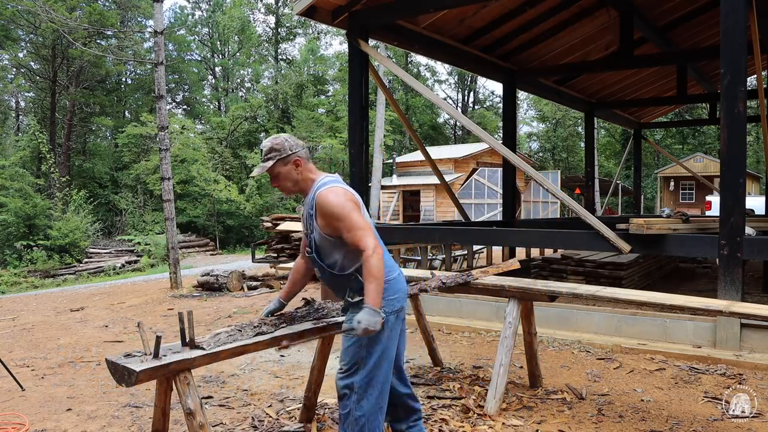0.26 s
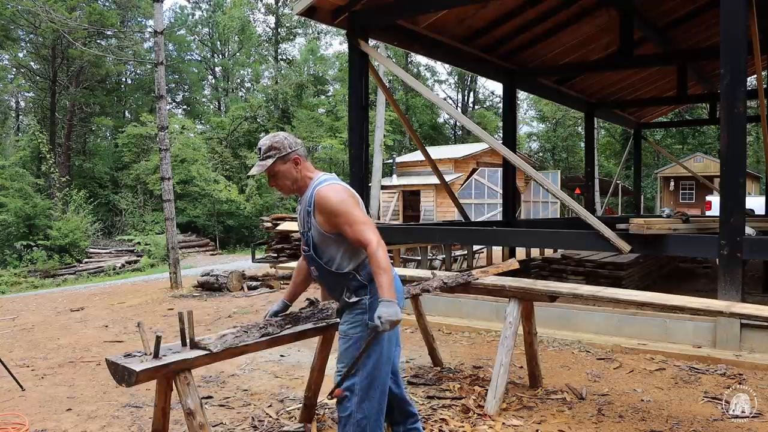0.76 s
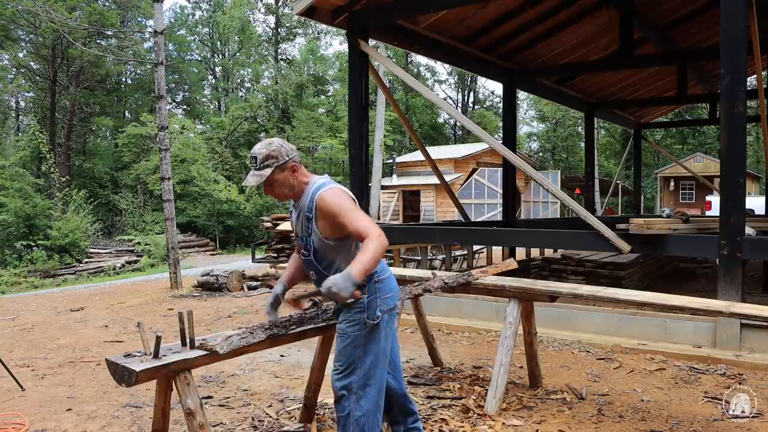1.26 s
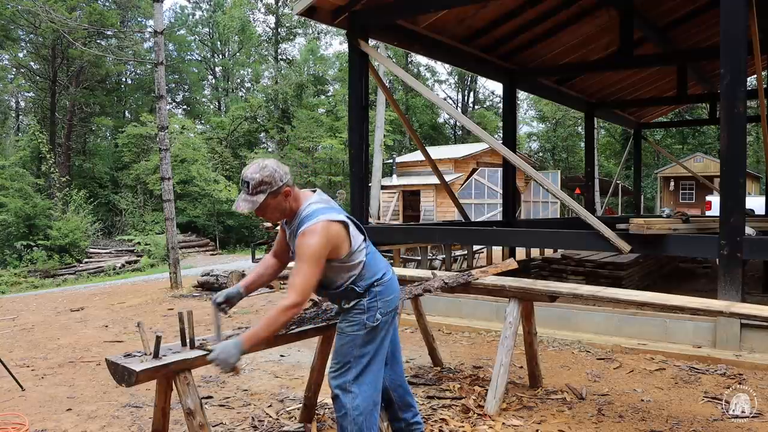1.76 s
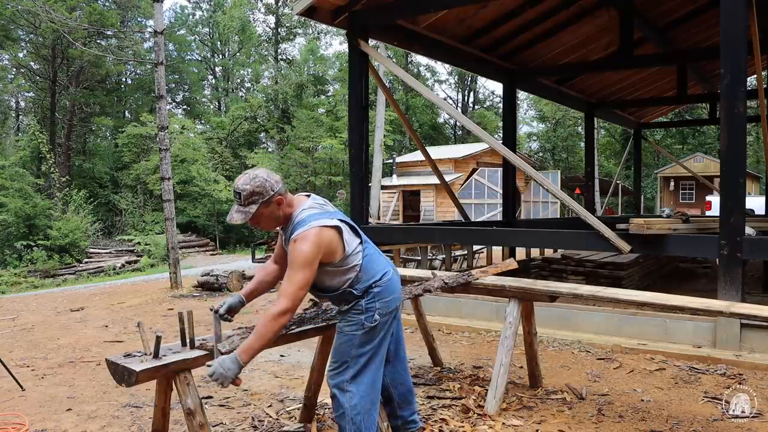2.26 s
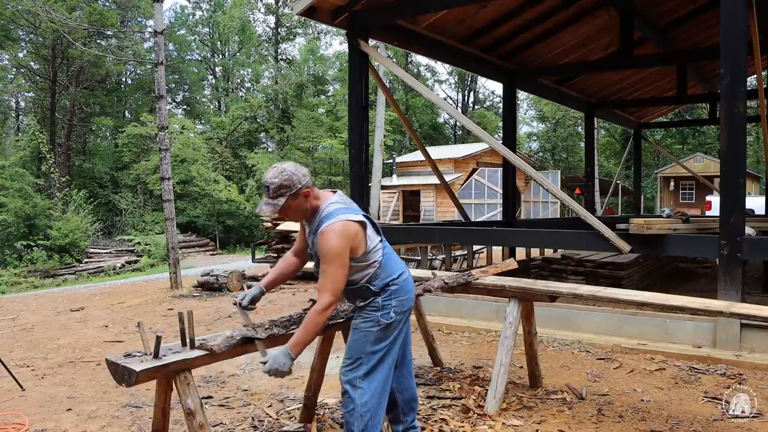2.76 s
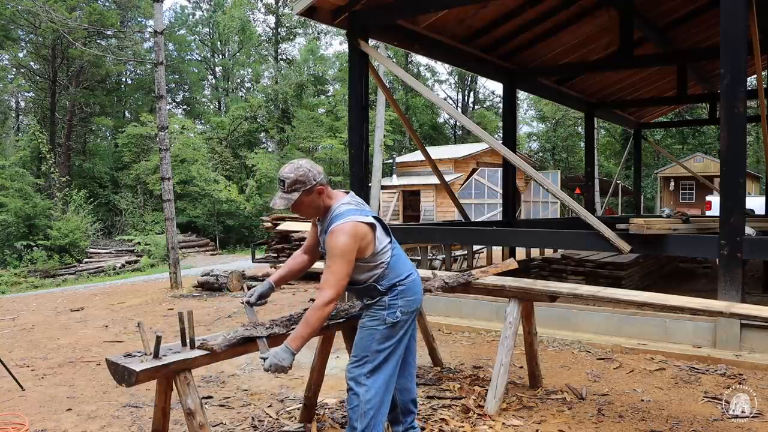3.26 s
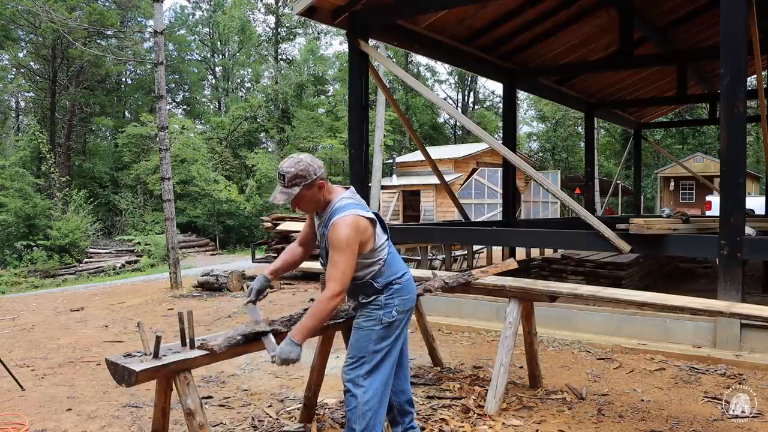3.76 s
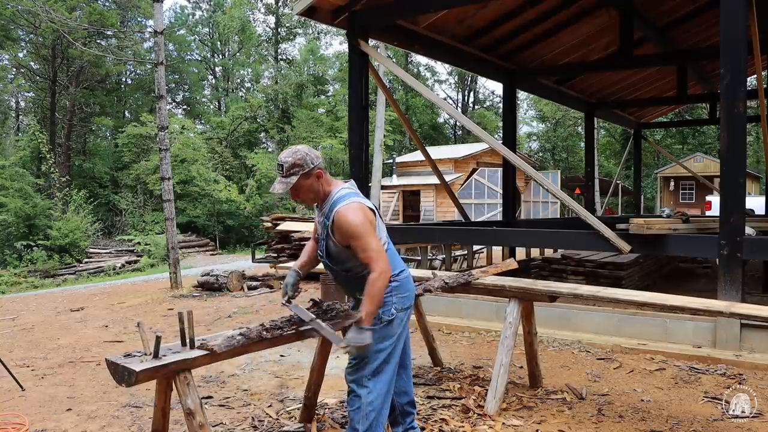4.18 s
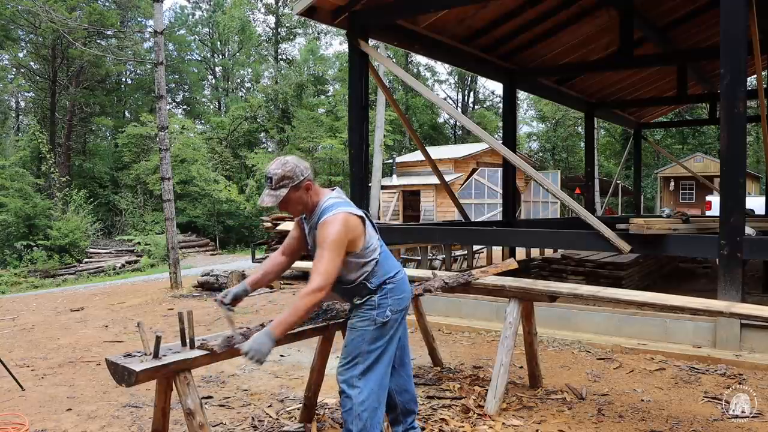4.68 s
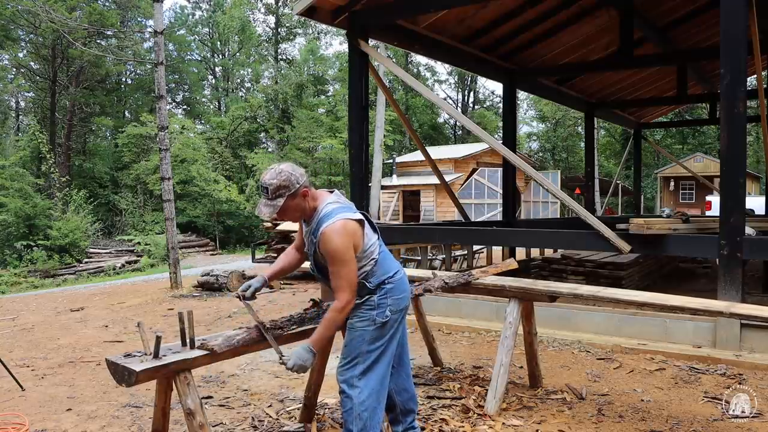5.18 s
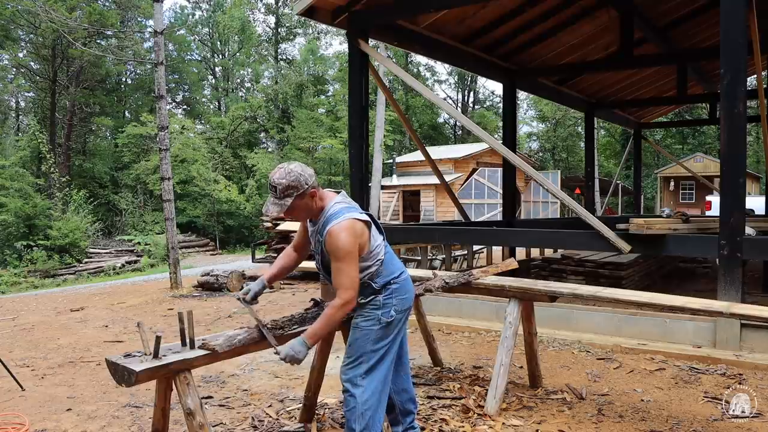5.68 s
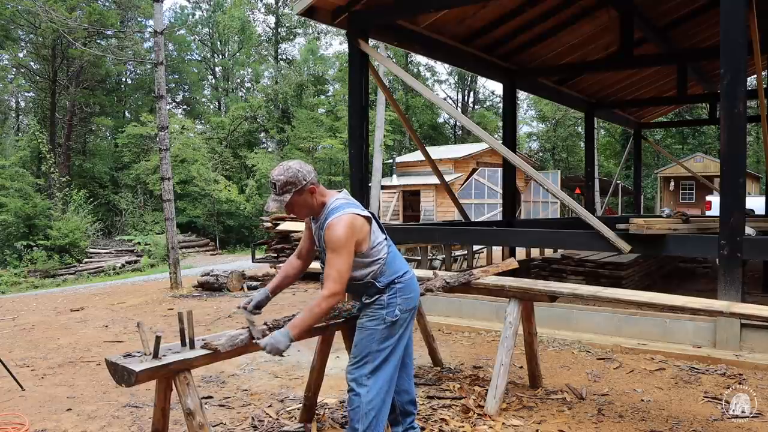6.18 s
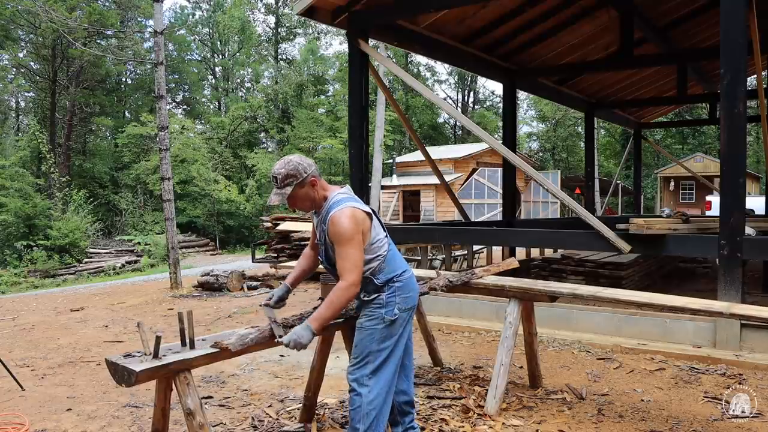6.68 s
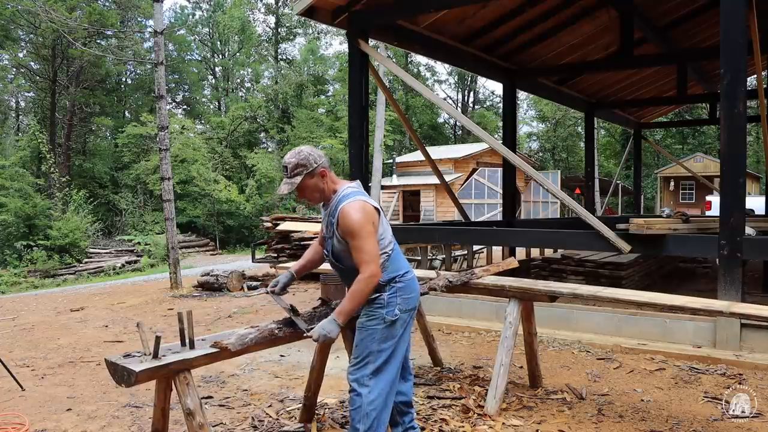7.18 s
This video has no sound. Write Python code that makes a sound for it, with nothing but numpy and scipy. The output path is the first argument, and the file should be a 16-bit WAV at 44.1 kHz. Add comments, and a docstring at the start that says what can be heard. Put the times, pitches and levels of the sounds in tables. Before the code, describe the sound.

Quiet scraping and scattered woody snaps build to a few very loud, sharp bark cracks with brief steel ringing, over faint forest insect hiss.

```python
"""A steady insect hiss over open air, a faint short scrape, then knocks: a man peels a pine slab with a drawknife.
Scrape and soft rustles of his steps: tiny coloured clicks under one kind of envelope. Cracks: noise bursts of
breaking bark. Knocks and one short squeak: damped modes of the slab on its trestles plus coloured noise bursts.
Steel: rings after hard bites and sings faintly on bare wood. Shed roof: short scattered echo.
Forest: two bands of coloured noise."""
import sys
import numpy as np
from scipy import signal
from scipy.fft import rfft, irfft
from scipy.io import wavfile
from scipy.ndimage import uniform_filter1d

SR = 44100
rng = np.random.default_rng(int(sys.argv[2]) if len(sys.argv) > 2 else 0)


def persist_wave(psi):
    """Save psi, clipped to +-1, as 16-bit WAV."""
    counts = np.round(np.clip(psi, -1, 1) * 32767).astype(np.int16)
    wavfile.write(sys.argv[1], SR, np.atleast_2d(counts).T)


N = 328545
TIME_S = np.arange(N) / SR

# open air and forest: (frequency [Hz], relative density [dB per Hz])
AIR_COLOUR = [(15, -48), (35, -3.5), (60, 0.5), (120, 6), (220, 0), (500, -0.5), (800, -0.5), (1250, -10.5),
              (2800, -11), (4800, -20), (8500, -21), (14000, -20.5), (15300, -23.5), (16000, -16.5)]
# insect chorus: (frequency [Hz], relative density [dB per Hz])
INSECT_COLOUR = [(4800, -24), (5300, -19.5), (5900, -21), (6300, -9.5), (6700, -1.5), (7150, -0.5),
                 (7500, -8.5), (7900, -17), (8200, -23), (10000, -76)]
# echo decay: (frequency [Hz], t60 [s])
SHED_T60 = [(150, 0.36), (400, 0.25), (1000, 0.41), (2800, 0.56), (7000, 0.59), (14000, 0.3)]
# echo spectrum: (frequency [Hz], relative level [dB])
SHED_COLOUR = [(100, 15.5), (400, 17.5), (1000, 11.5), (2800, 2.5), (5000, 1.5), (8000, 0.5), (15000, -3)]
# sound sent toward the shed as the man shifts along the slab: (time [s], gain [dB])
TOWARD_SHED = [(.13, -7), (2.8, 3), (3.8, -10), (4.4, -9), (4.9, -7), (5.6, -6), (6.33, -3), (6.69, -5.5),
               (7.02, -2.5)]
# blows on the slab, and one short squeak (3.767):
# (time [s], relative level [dB], centre [Hz], spread [octaves], contact time [s])
KNOCKS = [(.1292, -8.5, 950, 0.39, 0.05), (.136, -12.5, 705, 0.82, 0.044),  (0.983, -30, 298, 0.86, 0.058),
          (2.184, -31.5, 220, 0.76, 0.24), (2.526, -34, 740, 0.9, 0.13), (3.767, -17, 880, 0.23, 0.02),
          (4.4081, -9, 895, 0.68, 0.0044), (4.793, -18.5, 175, 0.99, 0.057),
          (4.8998, -7.5, 684, 0.82, 0.067), (4.903, -4.5, 343, 0.2, 0.025), (4.921, -19, 328, 1.44, 0.099),
          (5.192, -25, 704, 0.5, 0.074), (5.222, -26.5, 260, 1.2, .06), (5.428, -24.5, 316, 0.26, 0.26),
          (5.577, -29.5, 800, 0.57, 0.015), (5.607, -22, 460, 0.41, 0.07), (5.615, -18.5, 161, 0.87, 0.05),
          (5.992, -24.5, 487, 0.78, 0.024), (6.299, -28.5, 516, 1.03, .031), (6.674, -12, 454, 0.89, 0.018)]
# modes of the slab on its trestles: (frequency [Hz], relative level [dB], t60 [s])
SLAB_MODES = [(174, 3.5, 0.18), (287, 5, 0.052), (334, 1, 0.11), (464.4, 8, 0.12), (586, -6, 0.058),
              (651, 9, 0.092), (766, -30, 0.12), (854, 6.5, 0.09), (923, 8, 0.062), (1087, -37, 0.069),
              (1286, -8, 0.08), (1550, -20, 0.24), (1900, -32, 0.04), (2250, 10.5, 0.13)]
# blade springing free: (time [s], relative ring level [dB], favoured pitch [Hz])
BITES = [(5.99, -30, 3640), (6.334, -35, 2300), (6.688, -35, 2700), (7.0168, -15.5, 3950),
         (7.028, -17.5, 1200)]
# modes of the blade wedged in the wood: (frequency [Hz], width before extra damping [Hz], relative level [dB])
BLADE_MODES = [(640, 10.4, 2), (880, 22, -14), (1193, 18, 2.5), (1540, 22, 1), (2200, 120, -9.5),
               (2700, 71, -4.5), (3150, 73, -11), (3340, 88, -7.5), (3770, 25, 1.5), (4050, 120, -8),
               (4450, 43, -14), (4900, 105, -27), (4830, 12.7, 3.5), (5690, 85, -8.5)]
# edge sliding on bare wood: (frequency [Hz], relative level [dB])
FRICTION_COLOUR = [(300, -20), (650, -3), (880, 10), (1200, -4), (1600, 1), (2600, -2), (3650, -4),
                   (4500, -8), (4850, -1), (5100, -3), (6000, -14), (9000, -30)]
# tearing fibres and flakes: (frequency [Hz], relative level [dB])
RASP_COLOUR = [(300, -59), (1000, -3.5), (1700, -2), (2800, 5.5), (4000, -3), (5500, -7), (8000, -16),
               (16000, -43)]
# rubbing wood: (frequency [Hz], relative level [dB])
RUB_COLOUR = [(60, -1.5), (170, -12.5), (400, 6.5), (650, 6.5), (900, 6.5), (1300, -1.5), (2200, -12),
              (5000, -24)]
# crumbling dry bark: (frequency [Hz], relative level [dB])
CRUMB_COLOUR = [(1000, -29), (3000, -1), (6000, -10), (9000, 6), (13000, 3), (16000, -13)]
# pulls of the blade, and soft rustles as the man steps (0.448, 0.819):
# (start [s], length [s], relative level [dB], bare wood under the edge [0-1], crumbling above that level [dB])
STROKES = [(0, 0.038, -44, 0, -25), (0.21, 0.094, -44, 0.45, -11.5), (0.448, .13, -49, 0.25, -25),
           (0.819, 0.19, -46.5, 0, -22), (2.092, 0.019, -59.5, 0.83, -13), (2.178, 0.11, -55.5, 0.53, -18),
           (2.426, 0.056, -57.5, 0.7, -18), (2.523, 0.055, -53.5, 0.91, -3), (2.602, 0.14, -47, 0, -18),
           (2.944, 0.17, -53, .2, -10), (3.2, 0.039, -51.5, 0, -9), (3.553, 0.26, -45.5, 0, -9.5),
           (3.898, 0.12, -49.5, 0.37, -3.5), (4.103, 0.039, -55.5, 0.77, -22),
           (4.181, 0.032, -48.5, 0.3, -8), (4.29, 0.28, -45.5, .1, -10), (4.662, 0.15, -48, 0.48, -6),
           (4.947, 0.12, -44.5, 0.64, -15), (5.149, 0.04, -48, 0.76, -19), (5.401, 0.089, -53.5, 0.59, -27),
           (5.537, 0.067, -50, 0.68, -10), (5.728, 0.087, -53, 0.54, -13), (5.95, 0.03, -41, .45, -21),
           (7.005, 0.045, -34, 0, -14), (7.342, 0.047, -45.5, 0, -3), (7.422, .03, -39, 0.2, -1)]
# larger pieces of bark breaking: (time [s], relative level [dB], woody body [dB], splintery top [dB], t60 [s])
CRACKS = [(0.265, -43, -17, 13, 0.015), (0.7234, -41.5, 10, -26, 0.061), (.7567, -43, 6.5, -17, 0.023),
          (2.7745, -32, -4, -17, 0.029), (2.7867, -28, -0.5, -16, 0.022), (2.857, -30.5, -3.5, -24, 0.02),
          (2.97, -40, 5.5, -20, 0.039), (3.1091, -41, 13, -28, 0.053), (3.2665, -36, -8, -24, 0.019),
          (3.3753, -39.5, -1, -22, .023), (3.4083, -37.5, 2.5, -33, 0.0047), (3.642, -28.5, -3, -17, .028),
          (3.6533, -28, -6, -22, 0.018), (3.7127, -28, -1, -7.5, 0.014), (3.7296, -29.5, 0, -16, 0.024),
          (3.789, -28.5, 10, -25, 0.048), (3.8077, -30.5, 8, -19, 0.081), (3.8297, -31.5, 11.5, -22, .03),
          (3.989, -26.5, 10.5, -10, 0.033), (4.3004, -43.5, 12, -24, 0.048), (4.3452, -31, 10.5, -16, .022),
          (4.3925, -24.5, 11.5, -26, 0.016), (4.4064, -23, 20.5, -8.5, 0.017),
          (4.5076, -24, -7, -35, 0.022), (4.5857, -35.5, -3, -11, 0.046), (4.6157, -30, 18.5, -25, .028),
          (4.7876, -27, 11, -20, 0.03), (4.811, -20, 18, -16, 0.076), (4.8196, -17.5, -3, -22, 0.059),
          (5.1896, -34, 8, -9, .12), (5.2098, -32, 12, -4, 0.045), (5.6021, -30, 10, -17, 0.041),
          (5.9912, -15.5, -6, -25, 0.025), (6.1836, -43.5, 1, 3.5, 0.0066), (6.333, -6, 0.5, -27.5, 0.048),
          (6.672, -16.5, 3.5, -26, 0.08), (6.6875, -3, -1.5, -23.5, 0.038), (7.0035, -19, -7, -18, 0.092),
          (7.017, -5.5, 3, -10, 0.019), (7.0266, -12, -2, -14, 0.048), (7.1181, -28, 10.5, -19.5, 0.042),
          (7.3547, -30, -11, -12, 0.032), (7.37, -28, -3, -30, 0.11), (7.3796, -35, 10, -9, 0.018),
          (7.4182, -33, 0, -11, 0.017)]
# spectrum common to all cracks: (frequency [Hz], relative level [dB])
CRACK_COLOUR = [(40, -33), (150, -9.5), (280, -13), (430, -1), (950, 1.5), (1400, -3), (2400, 6.5),
                (4000, -3), (5500, 1.5), (8000, 1), (13000, 0), (16000, -11)]

LOWPASS_HZ = 16100
TEAR_LEAD_S = .004  # fibres start tearing this long before a snap
# a pull or rustle takes hold, builds up to its end, then dies away
ATTACK_S, SWELL_DB, RELEASE_DB_PER_S = 0.014, 4.5, 166
# bare wood rubs harder than bark and sets the steel singing
RUB_DB_WHEN_BARE, SING_DB_WHEN_BARE = 8, 34.5
# the more wood a piece takes with it, the lower it rings
CHIP_HZ, CHIP_OCTAVES_PER_DB = 3070, 0.1
# cracks harder than HARD_DB jolt the slab too
HARD_DB = -9
JOLT_DB, JOLT_HZ, JOLT_OCTAVES, JOLT_S = -15.5, 210, 1, 0.021


def amp(db):
    """Decibels to gain."""
    return 10 ** (np.asarray(db) / 20)


def evened(x):
    """Scales to an rms of one."""
    return x / np.sqrt(np.mean(x ** 2) + 1e-20)


def read(points, hz):
    """Curve joined by straight lines over log frequency."""
    point_hz, value = np.transpose(points)
    return np.interp(np.log(hz + 1), np.log(point_hz + 1), value)


def add(mix, start_s, sound):
    """Mixes a sound in at a time."""
    part = mix[max(round(start_s * SR), 0):][:len(sound)]
    part += sound[:len(part)]


def coloured(x, points):
    """Full-length sound given a spectrum, at unit rms."""
    gain = amp(read(points, np.fft.rfftfreq(N, 1 / SR)))
    return evened(irfft(rfft(x) * gain, N))


def causal(x, gain_db):
    """Minimum-phase filter for a short sound: nothing rings before its attack."""
    log_gain = np.log(amp(np.concatenate([gain_db, gain_db[-2:0:-1]])))
    response = np.exp(np.conj(signal.hilbert(log_gain)))[:len(gain_db)]
    return irfft(rfft(x) * response)


def hump(hz, centre_hz, octaves):
    """Bell of height one on a log frequency axis."""
    return np.exp(-(np.log2((hz + 1) / centre_hz) / octaves) ** 2)


def ring(modes, size=16384):
    """Damped sines of a resonant body, alternating in sign."""
    t = np.arange(size) / SR
    out = np.zeros(size)
    for k, (hz, db, t60_s) in enumerate(modes):
        out += (-1) ** k * amp(db - 60 * t / t60_s) * np.sin(2 * np.pi * hz * t)
    return out


def burst(t60_s, snap, lumpy_db=4, tear_db=-19, size=8192):
    """Brief rising noise, then a snap and a dying, lumpy shower of noise; nearly white, about unit energy."""
    t = (np.arange(size) - round(TEAR_LEAD_S * SR)) / SR
    lumps = evened(uniform_filter1d(rng.standard_normal(size), size=30))
    tearing_db = tear_db + 10 * t / TEAR_LEAD_S
    decay_db = -60 * t / max(t60_s, .002)
    shape_db = np.where(t < 0, tearing_db, decay_db)
    x = rng.standard_normal(size) * amp(shape_db + lumpy_db * lumps)
    x = x / np.linalg.norm(x) + snap * (t == 0)
    power = uniform_filter1d(abs(rfft(x)) ** 2, size=130)
    return causal(x, -10 * np.log10(power + 1e-6))  # whitened


def grains(per_s, spread_db):
    """Random tiny clicks, a few much larger than the rest."""
    size = amp(spread_db * np.minimum(rng.exponential(1, N), 4))
    sign = rng.choice([-1, 1], N)
    return evened(size * sign * (rng.random(N) < per_s / SR))


def clumps(depth_db, step_s):
    """Gain that jumps about as the edge catches and slips."""
    steps = np.clip(rng.standard_normal(N // 40), -2, 2)
    return evened(amp(depth_db * np.interp(TIME_S / step_s, np.arange(len(steps)), steps)))


def steel_db(hz, damping=1, valley_db=-14):
    """Blade response: modal peaks over a low valley; damping widens and lowers the peaks."""
    peaks = sum(amp(db) ** 2 / (1 + (2 * (hz - mode_hz) / (width_hz * damping)) ** 2)
                for mode_hz, width_hz, db in BLADE_MODES)
    return 10 * np.log10(amp(valley_db) ** 2 + 2 * peaks / damping)


def effort(db_when_bare=0, crumbling=False, size=30000):
    """Gain over time: every pull or rustle has the same attack, swell and release."""
    out, t = np.zeros(N), np.arange(size) / SR
    for start_s, length_s, db, bare, crumble_db in STROKES:
        swell_db = SWELL_DB * (np.minimum(t / length_s, 1) - 1)
        release_db = -RELEASE_DB_PER_S * np.maximum(t - length_s, 0)
        level_db = db + db_when_bare * np.clip(bare, 0, 1) + crumbling * crumble_db
        attack = np.minimum(t / ATTACK_S, 1)
        add(out, start_s, attack * amp(level_db + swell_db + release_db))
    return out


def forest(air_db=-50.0, insects_db=-50.0):
    """Low wash of open air and a far insect chorus merged into one hiss."""
    air = coloured(rng.standard_normal(N), AIR_COLOUR)
    insects = coloured(rng.standard_normal(N), INSECT_COLOUR)
    return amp(air_db) * air + amp(insects_db) * insects


def shed(x, wet_db=-11, first_s=0.0099, build_s=0.0012, size=26000):
    """Roof and posts return a scattered echo: weak at first, full after a short gap, then decaying."""
    sparse = rng.standard_normal(size) * rng.random(size) ** 4
    hz, t, z = signal.stft(sparse, SR, nperseg=256)
    decay_db = -60 * t / read(SHED_T60, hz)[:, None]
    shape = amp(decay_db + read(SHED_COLOUR, hz)[:, None])
    tail = signal.istft(z * shape, SR, nperseg=256)[1][:size]
    tail *= np.interp(np.arange(size) / SR, [.003, first_s, first_s + build_s], [.3, .45, 1])
    return amp(wet_db) * signal.oaconvolve(x, tail / np.linalg.norm(tail))[:N]


def blow_db(hz, centre_hz, octaves, tick_db=-23, tick_hz=1700):
    """Spectrum of a knock or the squeak: a hump at its centre plus a weaker tick at a fixed pitch."""
    tick = amp(tick_db) ** 2 * hump(hz, tick_hz, 0.69)
    return 10 * np.log10(hump(hz, centre_hz, octaves) + tick + 1e-6)


def knocks(ring_db=-17, clatter_db=32, cutoff_hz=110, size=8192):
    """Blows, and one short squeak, ring slab modes around their own pitch and add a dull clatter of noise."""
    out, hz = np.zeros(N), np.fft.rfftfreq(size, 1 / SR)
    jolts = [(s, db + JOLT_DB, JOLT_HZ, JOLT_OCTAVES, JOLT_S) for s, db, *_ in CRACKS if db > HARD_DB]
    for s, db, centre_hz, octaves, contact_s in KNOCKS + jolts:
        rocking = min(contact_s / 0.023, 1) ** 2  # a brief contact hardly sets the slab going
        modes = [(f, level_db + blow_db(f, centre_hz, octaves), t60_s) for f, level_db, t60_s in SLAB_MODES]
        clatter = causal(burst(contact_s, snap=0.022), blow_db(hz, centre_hz, octaves))
        add(out, s, rocking * amp(db + ring_db) * ring(modes))
        add(out, s - TEAR_LEAD_S, amp(db + clatter_db) * clatter)
    # keeps the knocks free of deep bass
    return signal.sosfilt(signal.butter(2, cutoff_hz, "high", fs=SR, output="sos"), out)


def blade(bite_db=-4):
    """Steel rings after each hard bite, strongest near the favoured pitch; t60 follows mode width."""
    out = np.zeros(N)
    for s, db, favoured_hz in BITES:
        modes = []
        for mode_hz, width_hz, level_db in BLADE_MODES:
            favour_db = 18 * (hump(mode_hz, favoured_hz, 0.44) - 1)
            t60_s = np.log(1000) / np.pi / width_hz
            modes.append((mode_hz, level_db + favour_db, t60_s))
        add(out, s, amp(db + bite_db) * ring(modes))
    return out


def glide(glide_db=-21, judder_db=5):
    """Steel sings faintly as it judders along bare wood: friction noise through the blade response."""
    hz = np.fft.rfftfreq(N, 1 / SR)
    friction = coloured(clumps(judder_db, .015) * rng.standard_normal(N), FRICTION_COLOUR)
    singing = evened(irfft(rfft(friction) * amp(steel_db(hz, damping=3)), N))
    return singing * amp(glide_db) * effort(SING_DB_WHEN_BARE)


def chips(per_s=70, spread_db=4, t60_s=0.023, count=14):
    """Small flakes snap off at random, spread over a set of pitches."""
    out, hz = np.zeros(N), np.fft.rfftfreq(8192, 1 / SR)
    for chip_hz in np.geomspace(1700, 5500, count):
        colour_db = read(RASP_COLOUR, hz) / 2 + 12 * hump(hz, chip_hz, 0.52)
        tick = causal(burst(t60_s, snap=0.94), colour_db)
        out += signal.oaconvolve(grains(per_s / count, spread_db), tick)[:N]
    return evened(out)


def scrape(rasp_db=-1.5, chips_db=-0.5, rub_db=-2, crumb_db=0, catch_db=3, crumble_db=9.0):
    """Fibres tear, flakes tick, wood rubs and dry bark crumbles; the same grains make the soft step rustles."""
    rasp, rub, crumb = effort(), effort(RUB_DB_WHEN_BARE), effort(crumbling=True)
    tearing = coloured(grains(per_s=5000, spread_db=4.0) * clumps(catch_db, 0.011), RASP_COLOUR)
    rubbing = coloured(grains(per_s=1500, spread_db=3.0), RUB_COLOUR)
    crumbling = coloured(grains(per_s=4000, spread_db=5.5) * clumps(crumble_db, 0.0079), CRUMB_COLOUR)
    out = amp(rasp_db) * rasp * tearing
    out += amp(chips_db) * np.sqrt(rasp * crumb) * chips()  # most flakes fly where the bark is loose
    out += amp(rub_db) * rub * rubbing
    return out + amp(crumb_db) * crumb * crumbling


def cracks(damping, level_db=-1.0, snap=0.37, chip_db=6, chip_octaves=0.44,
           steel_gain_db=6, steel_top_db=8, size=8192):
    """Each break has a woody body, a ringing chip and a splintery top; the hardest shake the wedged blade."""
    out, hz = np.zeros(N), np.fft.rfftfreq(size, 1 / SR)
    body = read([(1000, 1), (1800, 0.18)], hz)
    top = read([(4000, 0.019), (8000, 0.77)], hz)
    wedged_db = steel_db(hz, damping, valley_db=-12.5) + steel_gain_db + steel_top_db * top
    for s, db, body_db, top_db, t60_s in CRACKS:
        chip_hz = CHIP_HZ * 2 ** (-CHIP_OCTAVES_PER_DB * body_db)
        bite = np.interp(db, [-22, -9], [0, 1])  # hard cracks trade the chip for steel
        colour_db = read(CRACK_COLOUR, hz) + body_db * body + top_db * top
        colour_db += (1 - bite) * chip_db * hump(hz, chip_hz, chip_octaves) + bite * wedged_db
        add(out, s - TEAR_LEAD_S, causal(burst(t60_s, snap), db + colour_db))
    return out * np.sqrt(SR / 100) * amp(level_db)  # burst energy referred to rms over 0.01 s


def scene():
    """Work at the trestles, its echo and the forest."""
    ringing = knocks() + blade()
    direct = cracks(damping=2) + ringing
    # the shed gathers sound from all directions, where the blade's peaks blur together
    scattered = cracks(damping=9) + ringing
    toward_shed = amp(np.interp(TIME_S, *np.transpose(TOWARD_SHED)))
    echo = shed(scattered * toward_shed)
    return (direct + echo + glide() + scrape() + forest())[None]


def record(dry):
    """Hard clipping at full scale, then a linear-phase low-pass."""
    clipped = np.clip(dry, -1, 1)
    lowpass = signal.firwin(401, LOWPASS_HZ, window=("kaiser", 7), fs=SR)
    return signal.oaconvolve(clipped, lowpass[None], "same")


dry = scene()
out = record(dry)
persist_wave(out)
```